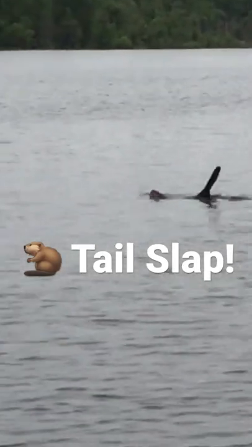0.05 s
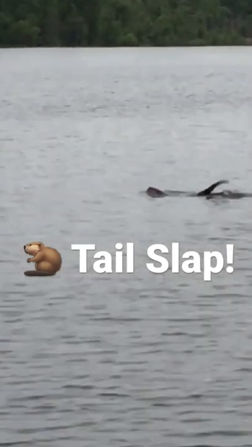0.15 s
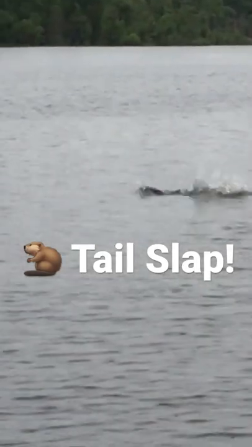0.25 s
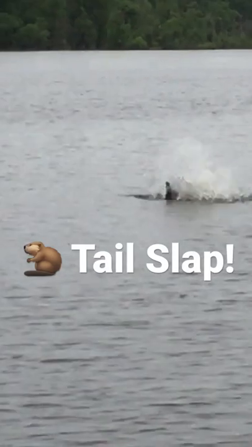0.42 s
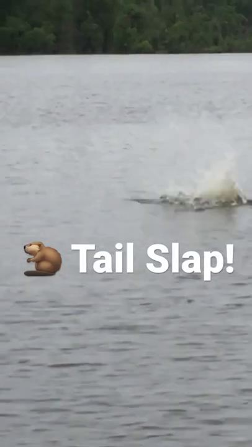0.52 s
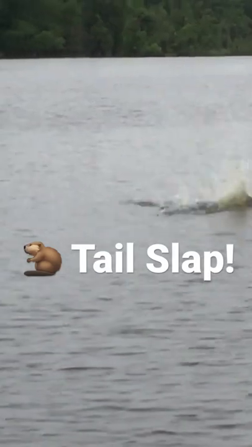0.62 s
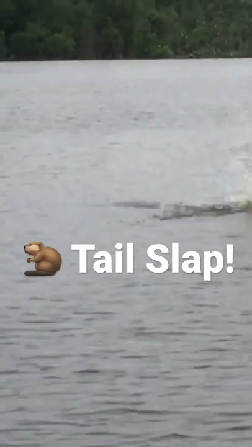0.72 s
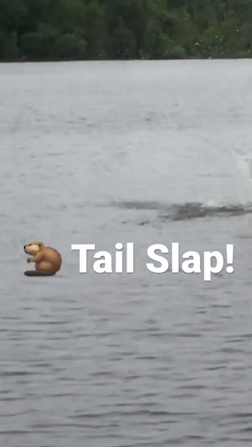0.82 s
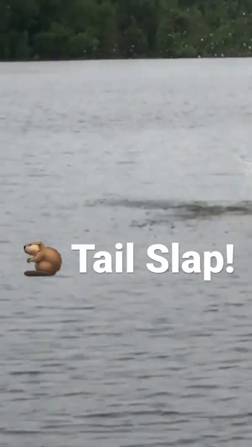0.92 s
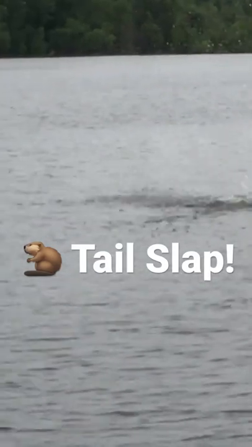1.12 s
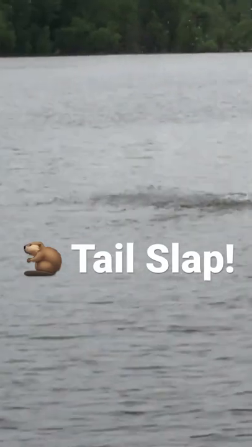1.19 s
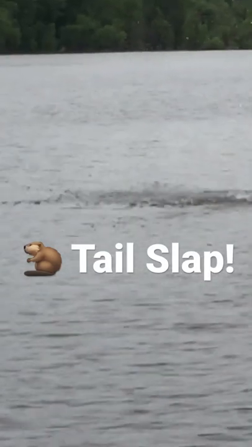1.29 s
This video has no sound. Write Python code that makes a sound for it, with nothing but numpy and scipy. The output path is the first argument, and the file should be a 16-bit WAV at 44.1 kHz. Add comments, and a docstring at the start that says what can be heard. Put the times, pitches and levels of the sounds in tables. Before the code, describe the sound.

A beaver's tail slaps the water with a sharp crack. A smaller splash and a deep plunk follow as it dives, then spray patters back onto the lake. A faint bird warbles far off over low outdoor rumble.

```python
"""A lake with a wooded shore; at the microphone, a low rumble of open air and a faint, thin tone.
A beaver slaps its tail on the water and dives: a sharp crack, a smaller splash, then the deep plunk
of an air cavity closing. Thrown water rains back as a wash of bubbles and spray that grows brighter.
Far off a small bird starts to warble, and the last, larger drops land."""
import sys
import numpy as np
from scipy import signal
from scipy.fft import rfft, irfft, next_fast_len
from scipy.io import wavfile
from scipy.ndimage import map_coordinates

SR = 44100
rng = np.random.default_rng(int(sys.argv[2]) if len(sys.argv) > 2 else 0)


def unload_wav(signal):
    """Save mono or channel-first audio to the path in sys.argv[1] as 16-bit WAV at rate SR, clipped to [-1, 1]."""
    wavfile.write(
        sys.argv[1],
        SR,
        np.round(np.clip(np.atleast_2d(signal).T, -1, 1) * 32767).astype(np.int16),
    )


N = 59535


def amp(db):
    """Gain of a level in dB."""
    return 10 ** (np.asarray(db) / 20)


def unit(x):
    """x at rms 1."""
    return x / np.sqrt(np.mean(x ** 2) + 1e-20)


def clock():
    """Time of every sample in seconds."""
    return np.arange(N) / SR


def along(points, hz):
    """(frequency [Hz], value) points read on a log axis."""
    f, v = np.transpose(points)
    return np.interp(np.log(hz + 1), np.log(f + 1), v)


def level(points):
    """Gain per sample from (time [s], level [dB]) points."""
    return amp(np.interp(clock(), *np.transpose(points)))


def wobble(rate):
    """A smooth random curve, rate knots a second."""
    return map_coordinates(rng.standard_normal(2000), [clock() * rate], mode="wrap")


def filtered(x, response):
    """x through a frequency response."""
    size = next_fast_len(N + SR // 2)
    return irfft(rfft(x, size) * response(np.fft.rfftfreq(size, 1 / SR)), size)[:N]


def coloured(x, colour):
    """x shaped by (frequency [Hz], gain [dB]) points, at rms 1."""
    return unit(filtered(x, lambda hz: amp(along(colour, hz))))


def noise(colour):
    """Coloured noise at rms 1."""
    return coloured(rng.standard_normal(N), colour)


def burst(s, rise_s, t60):
    """Envelope that swells to time s and dies away."""
    t = clock() - s
    return np.exp(np.minimum(t, 0) / rise_s - np.log(1000) * np.maximum(t, 0) / t60)


def bubbles(count, low_hz, high_hz, cycles, climb, spread_db):
    """Bubbles at random times, each a damped ring of rising pitch; together at rms 1."""
    when, size, strength = rng.random((count, 3)).T[:, :, None]
    hz = low_hz * (high_hz / low_hz) ** size
    samples = np.arange(700)
    age = hz * samples / SR / cycles  # 1 when the ring is 60 dB down
    phase = 2 * np.pi * cycles * age * (1 + climb * np.minimum(age, 1) / 2)
    ring = np.sin(phase) * np.exp(-np.log(1000) * age)
    gain = amp(spread_db * np.minimum(-np.log(1 - strength), 4))
    positions = (when * N).astype(int) + samples
    return unit(np.bincount(positions.ravel(), (gain * ring).ravel(), N)[:N])


def whistle(s, shape, waver, flutter_db):
    """A slightly unsteady sine along (time from s [s], pitch [Hz], level [dB]) points."""
    at, hz, db = np.transpose(shape)
    t = clock() - s
    pitch = np.interp(t, at, hz) * (1 + waver * wobble(300))
    envelope = np.interp(t, at, amp(db), 0, 0) * amp(flutter_db * wobble(200))
    return envelope * np.sin(2 * np.pi * np.cumsum(pitch) / SR)


def air():
    """Low rumble and faint hiss over the open lake."""
    # course of each layer (time [s], level [dB])
    rumble = [(0, -62), (.11, -62.5), (.14, -56.5), (.3, -58), (.42, -53.5), (.7, -56), (.97, -55.5),
              (1.06, -59), (1.35, -54.5)]
    hiss = [(0, -77), (.11, -73), (.122, -63), (1.35, -71.5)]
    # their spectra (frequency [Hz], gain [dB])
    rumble_colour = [(20, -14), (40, 0), (60, 2.5), (110, -1), (170, -3), (260, -8.5), (400, -21),
                     (1500, -41.5)]
    hiss_colour = [(150, -26), (300, 0.5), (600, -8), (1200, -15), (2000, -17), (3000, -11.5), (5000, -27),
                   (7500, -19.5), (10000, -24), (13000, -11.5), (16000, -14.5)]
    swell = amp(2.2 * wobble(12.54))
    return level(rumble) * swell * noise(rumble_colour) + level(hiss) * noise(hiss_colour)


def thin_tone():
    """A faint, high tone hangs briefly in the background."""
    # its course (time [s], pitch [Hz], level [dB])
    course = [(.115, 7370, -82), (.125, 7330, -76), (.22, 7320, -81), (.33, 7300, -78)]
    return whistle(0, course, waver=0.0017, flutter_db=2.5)


def pops():
    """Single bubbles and air pockets pop, each with a short, damped ring."""
    # bubbles (time [s], pitch [Hz], relative level [dB], life [cycles])
    pockets = [(.160, 1830, -55, 50), (.412, 240, -42, 6.6), (0.4185, 630, -28.5, 9.3),
               (.4218, 686, -34, 3.8), (.441, 890, -36, 13), (.477, 1370, -37, 25), (0.4769, 340, -36, 8),
               (.561, 288, -39.5, 7.5), (.582, 600, -42.5, 13), (.624, 690, -45.5, 18),
               (.688, 152.5, -45, 15.2), (.914, 970, -48, 25), (.96, 165, -51.5, 21),
               (.982, 860, -47.5, 26), (.983, 1610, -42, 14), (1.011, 970, -46.5, 20),
               (1.046, 1850, -48.5, 35)]
    out = np.zeros(N)
    for s, hz, db, cycles in pockets:
        turns = hz * np.maximum(clock() - s, 0)
        envelope = (1 - np.exp(-2 * turns)) * np.exp(-np.log(1000) * turns / cycles)
        swing = -envelope * np.cos(2 * np.pi * turns)
        out += amp(db + 4) * np.gradient(swing) * SR / (2 * np.pi * hz)
    return out


def tail_slap():
    """The flat tail meets the water in a quick run of cracks; the hardest rings the air under it."""
    # tail strikes (time [s], relative level [dB])
    cracks = [(0.2301, -29.5), (0.2337, -19.5), (0.2352, -18.5)]
    # their spectrum (frequency [Hz], gain [dB])
    colour = [(130, -30), (280, 0), (600, -11.5), (1800, -8), (3500, -7.5), (5700, -15), (7000, -8.5),
              (9400, -8.5), (10300, -15), (11300, -8), (15200, -18.5), (16000, -18)]
    # resonances of the squeezed air (frequency [Hz], width [Hz], gain [dB])
    peaks = [(165, 59, -12), (334, 35, 2), (533, 73, -14.5), (1006, 47, 4.5), (1230, 56, -2.5),
             (1410, 50, 1), (1736, 100, 0), (1930, 88, -4), (2346, 99, 5), (3220, 155, 2), (4460, 110, 0),
             (5150, 141, -0.5), (6120, 120, -2), (6700, 110, -4.5)]

    def trapped_air(f):
        """The resonances summed with alternating signs."""
        return sum((-1) ** k * amp(db) * 1j * f * width / (hz * hz - f * f + 1j * f * width)
                   for k, (hz, width, db) in enumerate(peaks))

    blow = sum(amp(db) * burst(s, rise_s=0.00047, t60=0.014) for s, db in cracks)
    kick = amp(8) * (np.arange(N) == np.argmax(blow))
    return amp(-6) * blow * noise(colour) + filtered(kick, trapped_air)


def splashes():
    """The body and the water it throws tear the surface in short bursts."""
    # splashes (time [s], level [dB], t60 [s])
    hits = [(0.2375, -40.5, 0.078), (0.4197, -39.5, 0.044), (0.429, -47.5, 0.009), (0.479, -43.5, 0.079)]
    # their spectrum (frequency [Hz], gain [dB])
    colour = [(120, -32), (200, -34), (683, -5), (1320, -17.5), (3200, -10.5), (4040, -8), (4520, -18),
              (12600, -21.5), (16000, -32)]
    return noise(colour) * sum(amp(db) * burst(s, rise_s=0.003, t60=t60) for s, db, t60 in hits)


def collapses():
    """Each collapsing air pocket sends one pressure spike between two shallow dips."""
    # spikes (time [s], width [s], relative level [dB])
    spikes = [(.2390, 0.00046, -17), (0.2406, 0.00035, -17)]
    out = np.zeros(N)
    for s, width, db in spikes:
        offset = np.hypot((clock() - s) / width, .15)  # rounds the tip
        out += amp(db + 1) * (1 - offset) * np.exp(-offset)
    return out


def churn():
    """Water closes over the dive: middling bubbles on a dull rush."""
    # course of the churning (time [s], level [dB])
    course = [(0, -76.5), (.225, -73), (.245, -48), (.285, -62.5), (.33, -63), (.40, -53.5), (.44, -47.5),
              (.5, -46.5), (.62, -53), (.75, -53), (.88, -57), (.99, -58.5), (1.08, -56), (1.35, -61)]
    # spectrum of the rush (frequency [Hz], gain [dB])
    colour = [(100, -26), (250, 0.5), (420, -6.5), (580, 0.5), (760, -7.5), (950, 0), (1400, -5.5),
              (2200, -10.5), (4000, -15), (6000, -34.5), (16000, -20.5)]
    gurgle = bubbles(count=1500, low_hz=401, high_hz=4220, cycles=16, climb=0.15, spread_db=2)
    return level(course) * amp(1.3 * wobble(39.07)) * unit(noise(colour) + amp(-4.5) * gurgle)


def spray():
    """Spray patters back on the lake: tiny ticks and small bubbles on fizz."""
    # course of the falling spray (time [s], level [dB])
    course = [(0, -87), (.24, -69), (.33, -65), (.43, -54), (.54, -52.5), (.64, -54), (.8, -55), (.95, -54),
              (1.05, -53), (1.25, -51.5), (1.35, -51.5)]
    # spectrum of fizz and ticks (frequency [Hz], gain [dB])
    colour = [(400, -9.5), (1100, -5), (1800, -0.5), (2600, 0.5), (4200, -1.5), (5500, -4), (8000, -3.5),
              (12000, -3), (16000, -6.5)]
    ticks = bubbles(count=2400, low_hz=3780, high_hz=15100, cycles=3.1, climb=0.11, spread_db=3.5)
    plinks = bubbles(count=800, low_hz=1500, high_hz=4970, cycles=22, climb=0.45, spread_db=3)
    envelope = level(course) * amp(wobble(50.05))
    return envelope * unit(noise(colour) + coloured(ticks, colour) + amp(-6.5) * plinks)


def cavity(start_s=.4755, life_s=0.1056, base_hz=59.5, t60=0.56):
    """The big air cavity opens with a falling thump, throbs, climbs as it nears the surface, and vents."""
    t = np.maximum(clock() - start_s, 0)
    fall_hz = 213 * np.exp(-(t / 0.00568) ** 2)
    climb_hz = 58.6 * np.exp(np.minimum(t - life_s, 0) / 0.0197)
    hz = base_hz + fall_hz + climb_hz
    attack = 1 - np.exp(-t / 0.0047)
    punch = 1 + 1.47 * np.exp(-(t / .011) ** 2)
    vent = (1 - np.tanh((t - life_s) / .004)) / 2
    envelope = attack * punch * np.exp(-np.log(1000) * t / t60) * vent
    return amp(-27.5) * envelope * np.sin(2 * np.pi * np.cumsum(hz * (t > 0)) / SR)


def bird(settle_s=0.0367, fade_s=0.024):
    """A small bird far off: each thin note flutters up to a crest and falls to a held whistle."""
    # notes (crest time [s], rise level [dB], fall level [dB], final pitch [Hz])
    notes = [(.762, -61, -52, 5880), (0.932, -57, -51, 6020), (1.105, -52, -51, 5280),
             (1.285, -51.5, -58, 6000)]
    # upward sweep and start of the fall (time from crest [s], pitch [Hz], gain [dB])
    rise = [(-.085, 3946, -5), (-.06, 4660, -2.5), (-.043, 6440, -6), (-.015, 6800, -18), (0, 7500, -8),
            (0.011, 6870, -8)]
    fall_start = [(.012, 6900, -6), (.018, 6490, -7), (.023, 6210, 1.5)]
    out = np.zeros(N)
    for s, rise_db, fall_db, end_hz in notes:
        fall = fall_start + [(settle_s, end_hz, -3), (settle_s + fade_s, end_hz, -25)]
        out += amp(rise_db) * whistle(s, rise, waver=0.0089, flutter_db=3.5)
        out += amp(fall_db) * whistle(s, fall, waver=0.00482, flutter_db=1.5)
    return out


def drops(width_octaves=.5):
    """Larger drops land with a soft splat, each around its own pitch."""
    # landings (time [s], pitch [Hz], level [dB])
    landings = [(1.011, 2120, -46), (1.075, 2900, -50), (1.161, 1500, -51.5), (1.189, 4140, -43.5),
                (1.205, 4000, -51), (1.222, 4100, -51), (1.246, 4500, -51), (1.302, 4300, -51),
                (1.311, 2800, -41)]
    out = np.zeros(N)
    for s, hz, db in landings:
        band = lambda f: 1 / (1 + (np.log2((f + 1) / hz) / width_octaves) ** 2)
        splat = unit(filtered(rng.standard_normal(N), band))
        out += amp(db) * burst(s, rise_s=.0012, t60=0.027) * splat
    return out


def shore(x):
    """The wooded shore returns a soft reverberation."""
    # its decay (frequency [Hz], t60 [s])
    decay_times = [(100, .25), (1000, 0.4), (6000, 0.39), (16000, 0.12)]
    hz, t, spectrum = signal.stft(rng.standard_normal(SR // 2), SR, nperseg=256)
    decay = np.exp(-np.log(1000) * t / along(decay_times, hz)[:, None])
    echo = signal.istft(spectrum * decay, SR, nperseg=256)[1]
    return signal.fftconvolve(x, echo / np.linalg.norm(echo))[:N]


def scene():
    """The lake in mono: the dive almost dry, the distant bird with much more of the shore's echo."""
    dive = tail_slap() + collapses() + pops() + splashes() + cavity() + drops()
    song = bird()
    background = song + amp(-7.5) * shore(song) + thin_tone() + air()
    return (dive + amp(-32) * shore(dive) + churn() + spray() + background)[None]


def record(dry, low_cut_hz=42.6, top_hz=16000):
    """The camera's microphone drops the deepest bass, hollows the treble and ends at its band limit."""
    # hollows in the treble (frequency [Hz], width [Hz], depth [dB])
    hollows = [(2673, 250, 2.5), (5080, 300, 2.5), (7940, 410, 4), (10360, 360, 4), (16100, 290, 5)]
    dips = lambda f: amp(-sum(db * np.exp(-((f - hz) / width) ** 2) for hz, width, db in hollows))
    low_cut = lambda f: 1 - 1 / (1 + (f / low_cut_hz) ** 4)
    return filtered(dry[0], lambda f: (f < top_hz) * dips(f) * low_cut(f))[None]


dry = scene()
out = record(dry)
unload_wav(out)
```